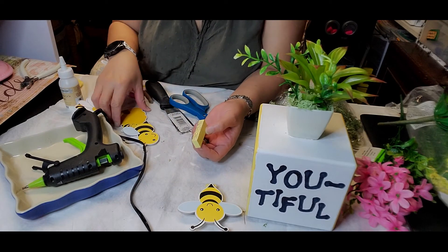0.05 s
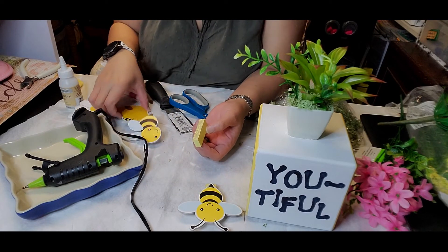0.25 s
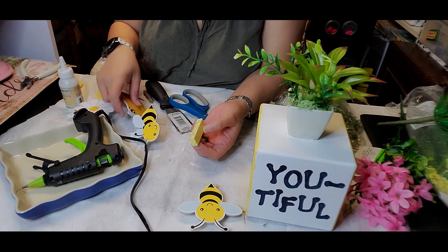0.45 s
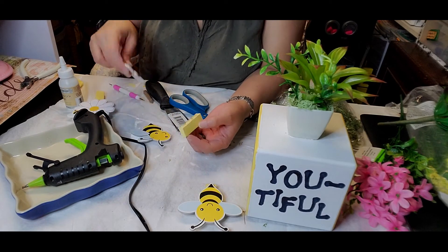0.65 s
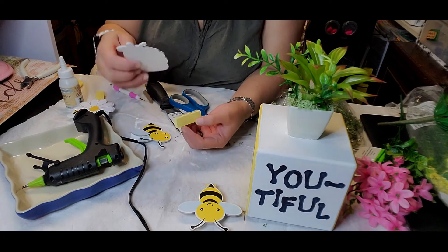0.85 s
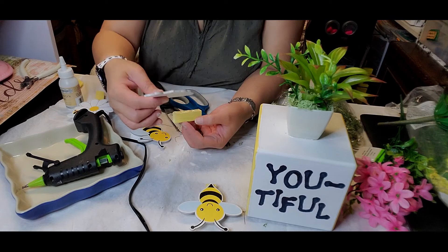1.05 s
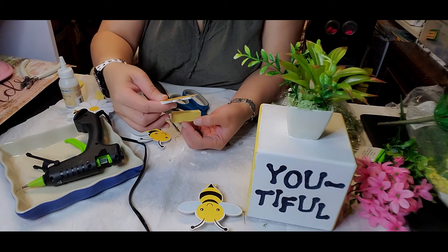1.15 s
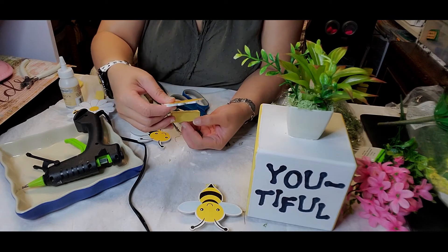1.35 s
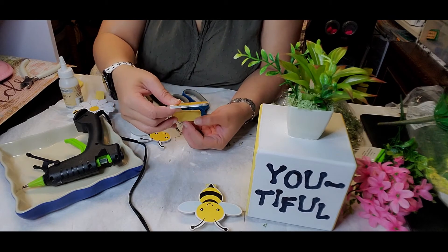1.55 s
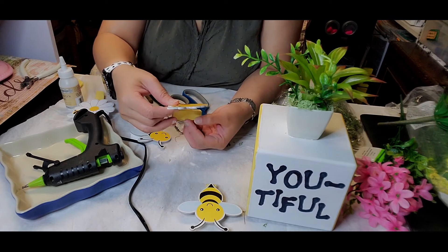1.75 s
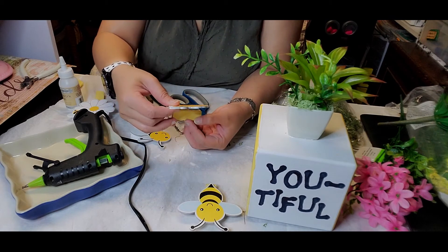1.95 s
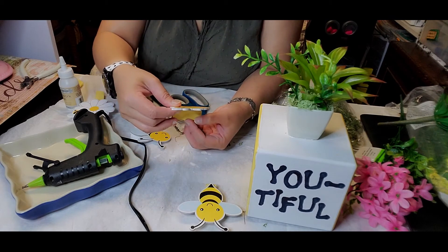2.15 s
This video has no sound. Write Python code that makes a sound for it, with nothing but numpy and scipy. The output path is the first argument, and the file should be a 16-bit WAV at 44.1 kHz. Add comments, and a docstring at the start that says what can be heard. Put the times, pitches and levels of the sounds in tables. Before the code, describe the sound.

Glue gun set down on a porcelain tray with sharp clacks, then faint taps and hum

```python
"""At a craft table in a room, a plastic glue gun is set down on a porcelain tray: it touches, clacks and rocks.
Each contact mixes a fast-fading snap, a noisy rattle, a thud, and ringing sine waves for tray and wire stand.
Fingers rustle card and cloth (grainy noise), and faint taps from across the room blend notes with dull knocks.
Behind it all, a low hum of wavering sine waves lies over a quiet hiss of coloured noise."""
import sys
import numpy as np
from scipy import signal
from scipy.fft import rfft, irfft, next_fast_len
from scipy.io import wavfile
from scipy.ndimage import map_coordinates

SR = 44100
rng = np.random.default_rng(int(sys.argv[2]) if len(sys.argv) > 2 else 0)


def dump(signal):
    """Clip the signal to [-1, 1] and save it as 16-bit WAV at the path in sys.argv[1]."""
    limited = np.clip(np.atleast_2d(signal).T, -1, 1)
    pcm = np.round(limited * 32767).astype(np.int16)
    wavfile.write(sys.argv[1], SR, pcm)


N = 97020
T = np.arange(SR // 3) / SR  # the time inside one short sound, s

# Colour of the hiss: f/Hz, relative level/dB
AIR_COLOUR = [(15, -55.5), (25, -13), (108, -0.5), (166, -12), (200, -17.5), (363, -20.5), (416, -29.5),
              (545, -20.5), (659, -33), (714, -28.5), (7710, -42), (12200, -42), (16000, -45.5)]
# How alike left and right are: f/Hz, likeness (1 = the same)
LIKENESS = [(30, .9), (150, 0.72), (600, .6), (2000, .3), (10000, 0.14)]
# How long the room echoes: f/Hz, time to fall 60 dB/s
ROOM_FADE = [(200, 0.27), (2000, 0.2), (6000, 0.17), (14000, .2)]
# Lowest hum tone, swelling and sinking: t/s, level/dB
HUM_LEVEL = [(0.0, -66), (0.04, -66.5), (0.1, -107), (0.27, -56.5), (0.38, -74), (0.46, -53), (0.64, -84),
             (0.76, -62.5), (0.84, -73.5), (0.92, -57.5), (1.13, -77.5), (1.16, -75), (1.55, -65),
             (1.62, -82), (1.92, -64.5), (2.2, -75)]
# Weaker hum tones: centre f/Hz, width of the pitch wander/Hz, average level/dB
HUM_TONES = [(125.8, 9, -78.5), (152.7, 3, -74.5), (302.5, 4, -86), (360.5, 3, -89.5), (544.5, 2.5, -91)]
# Finger movement on card and cloth: t/s, average level/dB
RUSTLE_LEVEL = [(0, -65), (.09, -75), (.15, -74), (.18, -66), (.3, -61.5), (.36, -55), (.42, -53),
                (.5, -65), (.6, -65), (.68, -72), (.76, -74), (.81, -88.5), (.96, -103), (.99, -85.5),
                (1.06, -96), (1.13, -98), (1.16, -74.5), (1.2, -79.5), (1.25, -86), (1.29, -98),
                (1.4, -103)]
# Colour of the rustle: f/Hz, relative level/dB
CARD_COLOUR = [(300, -32), (600, -13.5), (1500, -11.5), (2150, -6.5), (3500, -3), (4650, -6.5),
               (6500, -0.5), (8000, -9.5), (9500, -4.5), (12000, -13), (16000, -16)]
# Far taps: t/s, note level/dB, note f/Hz, note time to fall 60 dB/s, room relative level/dB,
# knock level/dB, knock tilt/dB per octave, left minus right/dB
FAR_TAPS = [(.707, -53.5, 1574, .05, 0.5, -66, -4, -3), (.866, -92, 3367, .02, -6, -83, 4, 6),
            (1.121, -60.5, 2397, 0.038, -5.5, -75, 4, -2.5), (1.15, -74, 2287, 0.092, -0.5, -84.5, -1, -1),
            (1.535, -51, 1560, 0.052, 0, -60.5, 1.5, -6), (1.535, -77, 4860, .03, -3, -89, -3, 0.5),
            (1.546, -50.5, 1532, 0.052, 3, -65.5, -0.5, 19), (2.024, -59, 4810, .04, -1.5, -88, 7, -3.5),
            (2.044, -55.5, 2636, .12, 3, -59.5, 2.5, -2.5), (2.046, -60.5, 2980, 0.063, 3, -71.5, 2.5, 1)]
# Colour of the dull knock: f/Hz, relative level/dB
KNOCK_COLOUR = [(200, -15), (350, -6), (580, 11), (1000, 1.5), (1800, -6), (3200, -20), (4500, -23),
                (6500, -22.5), (12000, -32)]
# Gun meets tray and wire stand: t/s, rise of rattle and rings/s, snap level/dB, rattle level/dB,
# snap and rattle f/Hz, tray level/dB, stand level/dB, ring tilt/dB per octave, thud level/dB,
# left minus right/dB
GUN_CONTACTS = [(0.183, .003, -62, -53, 5540, -71, -64, 0, -71, -4.5),
                (0.1894, .0015, -46.5, -49, 2970, -67.5, -49, -1.5, -58.5, -2.5),
                (0.2198, .002, -42.5, -32.5, 3900, -40.5, -65.5, -10.5, -50, -1.5),
                (.242, 0.00024, -11, -24.5, 6500, -21.5, -55.5, 2, -53.5, -2),
                (.284, .002, -57.5, -51, 5000, -49.5, -65, 0.5, -80, -0.5),
                (0.3746, .0008, -40, -40.5, 3977, -50.5, -68, -5, -59, -0.5),
                (0.426, .008, -63.5, -52, 5000, -65, -46.5, -2.5, -63.5, -2.5),
                (0.4347, .002, -50, -43, 6000, -42.5, -37, 3, -48.5, -4),
                (0.4497, .001, -34, -38, 4500, -59, -31.5, -4, -41.5, 1.5),
                (.471, .001, -42, -55.5, 3830, -82.5, -55, -2, -49.5, 2),
                (.5246, .0003, -16.5, -33, 6500, -52, -34, 12, -49.5, -4),
                (.543, .003, -57, -40.5, 6000, -64, -54.5, 9, -53, 1)]
# Ringing tones of the porcelain tray: f/Hz, relative level/dB, time to fall 60 dB before extra damping/s
TRAY_MODES = [(1112, -15, 0.11), (1797, -8.5, .07), (2118, -2.5, 0.14), (2350, -12.5, .08),
              (3340, -26.5, .04), (3963, -6.5, 0.096), (4876, 0, .05), (5084, -0.5, .06), (6280, -6, 0.086),
              (6480, -13, 0.017), (6650, -18, .05), (8900, -9.5, 0.076), (10310, -11.5, .04),
              (13200, -14.5, .03)]
# Ringing tones of the wire stand: f/Hz, relative level/dB, time to fall 60 dB before extra damping/s
STAND_MODES = [(2966, 0.5, 0.067), (4393, -15.5, .05), (5950, -16.5, .06), (6212, -20.5, .06),
               (6680, -20.5, .06), (9400, -25, 0.062)]
# Colour of the table-top thud: f/Hz, relative level/dB
THUD_COLOUR = [(40, -10), (100, -7), (250, -6), (700, -9), (1500, -17.5), (4000, -68)]
# Single short ringing notes around the contacts: t/s, level/dB, f/Hz,
# time to fall 60 dB before extra damping/s
SHORT_PINGS = [(.186, -45.5, 5400, .03), (.187, -49, 9700, .025), (.189, -41.5, 3300, .04),
               (.196, -48, 2400, .04), (.203, -48.5, 1550, .05), (.2215, -40, 8000, .015),
               (.222, -33, 3900, .04), (.277, -41.5, 2400, .04), (.287, -40, 5000, .02),
               (.437, -39, 9500, .03), (.4525, -39.5, 2003, .2), (.525, -44, 1800, 0.048),
               (.529, -47.5, 2043, 0.096)]

AIR_DB, HUM_HZ = -69, 100
TAP_ROUGH, TAP_Q = 0.85, 6.7  # share of noise in a tap's note, and how narrow that noise is
SNAP_S, RATTLE_S, THUD_S, KNOCK_S = 0.0033, 0.066, 0.13, 0.095  # times to fall 60 dB
RATTLE_Q = 0.92  # how narrow the rattle's noise is
BLUR = 0.28  # phase wander of a ringing tone, radians per kHz
FLUTTER_DB = 3  # each ringing tone swells and dips at random
FREE_S, DAMPED_S = 0.052, 0.05  # a ring runs free, then the gun's weight adds damping (time per 60 dB)
TRAY_LAG_S, STAND_LAG_S = 0.00013, 0.00002  # how much later the left side hears each part
WET_DB = -10  # room level behind the gun
TOP_HZ = 16200


def amp(db):
    """Turns decibels into a plain factor."""
    return 10 ** (np.asarray(db) / 20)


def unit(x):
    """Scales a sound to an average (rms) strength of 1."""
    return x / np.sqrt(np.mean(x ** 2) + 1e-20)


def along(points, hz):
    """Reads (Hz, value) points at any frequency, on a log axis."""
    f, v = np.transpose(points)
    return np.interp(np.log(hz + 1), np.log(f + 1), v)


def curve(rows):
    """Joins (s, value) points with straight lines, one value per sample."""
    return np.interp(np.arange(N) / SR, *np.transpose(rows))


def wobble(rate, size=N):
    """Makes a smooth random curve through `rate` random points a second."""
    points = rng.standard_normal(int(size * rate / SR) + 4)
    return map_coordinates(points, [np.arange(size) * rate / SR])


def filtered(x, response):
    """Makes each frequency louder or softer by response(Hz)."""
    m = next_fast_len(x.shape[-1] + 8192)
    spectrum = rfft(x, m) * response(np.fft.rfftfreq(m, 1 / SR))
    return irfft(spectrum, m)[..., :x.shape[-1]]


def noise(size, gain, alike):
    """Stereo noise of rms 1: a shared part and an opposed part set how alike the sides are."""
    def mid_and_side_gain(hz):
        turn = np.arccos(np.clip(along(alike, hz), -1, 1)) / 2
        return gain(hz) * [np.cos(turn), np.sin(turn)]

    mid, side = filtered(rng.standard_normal((2, size)), mid_and_side_gain)
    return unit(np.array([mid + side, mid - side]))


def peak(centre_hz, q):
    """Gain of one resonance applied twice: strongest at its centre, narrower for a larger q."""
    def gain(hz):
        spread = hz * centre_hz / q
        return spread ** 2 / np.abs(centre_hz ** 2 - hz ** 2 + 1j * spread) ** 2

    return gain


def fade(t60, rise):
    """A quick rise, then an exponential fall of 60 dB in t60 seconds."""
    return amp(-60 * T / t60) * (1 - np.exp(-T / rise))


def add(out, s, sound, pan_db, wet_db):
    """Places a sound at s seconds with a fresh room tail: noise that fades at each frequency's own speed."""
    hz, t, z = signal.stft(noise(SR // 2, lambda f: 1, LIKENESS), SR, nperseg=256)
    fading = z * amp(-60 * t / along(ROOM_FADE, hz)[:, None])
    tail = signal.istft(fading, SR, nperseg=256)[1]
    tail[:, :200] = 0  # the direct sound comes first
    both = amp(wet_db) * signal.fftconvolve(sound, tail / np.linalg.norm(tail[0]), axes=1)
    both[:, :len(T)] += sound * amp([[pan_db / 2], [-pan_db / 2]])
    at = round(s * SR)
    out[:, at:at + both.shape[1]] += both[:, :N - at]


def air():
    """Quiet hiss: steady coloured noise, slightly stronger on the right."""
    hiss = noise(N, lambda hz: amp(along(AIR_COLOUR, hz)), LIKENESS)
    return amp(AIR_DB) * hiss * amp([[-.7], [.7]])


def hum():
    """A swelling low sine wave, and weaker ones that waver in pitch and level."""
    t = np.arange(N) / SR
    low_wave = np.sin(2 * np.pi * HUM_HZ * t + .6 * wobble(9))
    hums = np.sqrt(2) * amp(curve(HUM_LEVEL)) * low_wave
    for hz, width, db in HUM_TONES:
        level = np.sqrt(2) * amp(db + 1.5 * wobble(8.8))
        pitch = hz + width / 4 * wobble(9.9)
        hums += level * np.sin(2 * np.pi * np.cumsum(pitch) / SR)
    return hums * amp([[-.9], [.9]])


def rustle():
    """Fingers on card and cloth: bright noise made grainy by quick random level changes."""
    after_last = np.arange(N) / SR > RUSTLE_LEVEL[-1][0]
    level_db = curve(RUSTLE_LEVEL) - 40 * after_last
    grain_db = 0.52 * wobble(44) + 1.5 * wobble(400)
    rub = noise(N, lambda hz: amp(along(CARD_COLOUR, hz)), [(1000, 0.6)])
    return amp(level_db + grain_db) * rub


def taps():
    """Small far taps: a sine wave blurred by narrow noise, and a dull noisy knock, with much room."""
    out = np.zeros((2, N))
    for s, db, hz, t60, room_db, knock_db, tilt_db, pan_db in FAR_TAPS:
        tone = np.sin(2 * np.pi * hz * T + np.array([[.8], [-.8]]))
        note = tone + TAP_ROUGH * noise(len(T), lambda f: peak(hz, TAP_Q)(f) ** 2, [(1000, 0.3)])
        knock = noise(len(T), lambda f: amp(along(KNOCK_COLOUR, f) + tilt_db * np.log2(f / 1000 + 0.11)),
                      LIKENESS)
        tap = fade(t60, 0.0028) * amp(db) * note + fade(KNOCK_S, 0.006) * amp(knock_db) * knock
        add(out, s, tap, pan_db, room_db)
    return out


def ring(modes, rise, tilt_db, lag):
    """A struck object rings in fading tones; each takes a new level and wanders in phase."""
    out = np.zeros((2, len(T)))
    for hz, db, t60 in modes:
        shared = wobble(150, size=len(T))
        each_side = np.array([wobble(100, size=len(T)), wobble(110, size=len(T))])
        wander = shared + .4 * each_side
        heard_at = T - lag * np.array([[1], [0]])  # left is later
        phase = 2 * np.pi * hz * heard_at + BLUR * hz / 1000 * wander
        level_db = db + rng.normal(0, 0.68) + tilt_db * np.log2(hz / 3000)
        flutter_db = FLUTTER_DB * wobble(120, size=len(T))
        out += amp(level_db + flutter_db) * fade(t60, rise) * np.sin(phase)
    return out * amp(-60 * np.maximum(T - FREE_S, 0) / DAMPED_S)


def snap(hz):
    """The click of a hard contact: three sine waves that die at once, later on the left."""
    waves = np.sin(2 * np.pi * hz * T)
    waves += .4 * np.sin(2 * np.pi * 1.9 * hz * T) + .25 * np.sin(2 * np.pi * 2.2 * hz * T)
    click = fade(SNAP_S, .00006) * waves
    return np.array([np.roll(click, round(TRAY_LAG_S * SR)), click])


def rattle(hz, rise):
    """A short rattle: noise around one pitch, with a grainy level."""
    grain = amp(1.9 * wobble(750, size=len(T)))
    return grain * fade(RATTLE_S, rise) * noise(len(T), peak(hz, RATTLE_Q), [(1000, 0.18)])


def thud():
    """The table top takes the knock: a short burst of low noise."""
    low_noise = noise(len(T), lambda f: amp(along(THUD_COLOUR, f)), [(300, 0.62), (1500, .5)])
    return fade(THUD_S, .003) * low_noise


def gun():
    """Each contact sounds as snap, rattle, table thud and rings; single short pings join the contacts."""
    out = np.zeros((2, N))
    for s, rise, snap_db, rattle_db, hz, tray_db, stand_db, tilt_db, thud_db, pan_db in GUN_CONTACTS:
        contact = amp(snap_db) * snap(hz)
        contact = contact + amp(rattle_db) * rattle(hz, rise)
        contact += amp(thud_db) * thud()
        contact += amp(tray_db) * ring(TRAY_MODES, rise, tilt_db, TRAY_LAG_S)
        contact += amp(stand_db) * ring(STAND_MODES, rise, tilt_db, STAND_LAG_S)
        add(out, s, contact, pan_db, WET_DB)
    for s, db, hz, t60 in SHORT_PINGS:
        ping = amp(db) * ring([(hz, 0, t60)], 0.0005, 0, TRAY_LAG_S)
        add(out, s, ping, 0, WET_DB)
    return out


def scene():
    """All layers together, from the background to the glue gun."""
    return air() + hum() + rustle() + taps() + gun()


def record(dry):
    """Keeps nothing at or above the top frequency."""
    return filtered(dry, lambda hz: hz < TOP_HZ)


dry = scene()
out = record(dry)
dump(out)
```